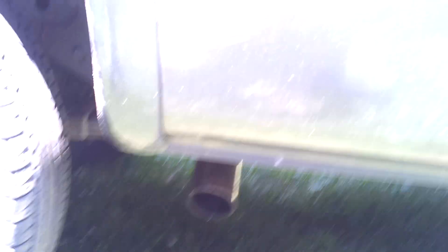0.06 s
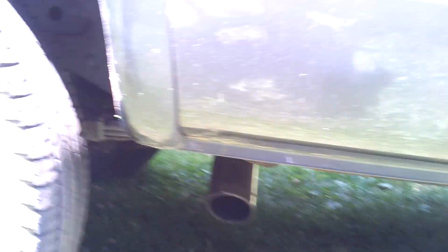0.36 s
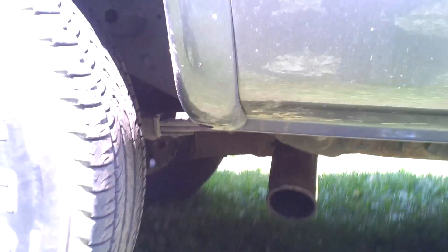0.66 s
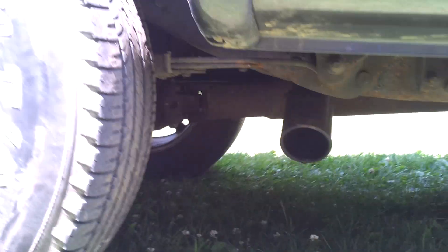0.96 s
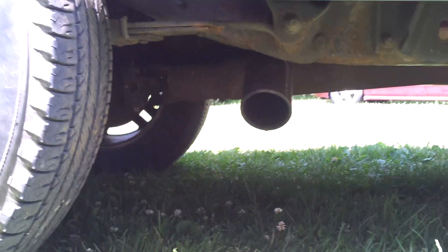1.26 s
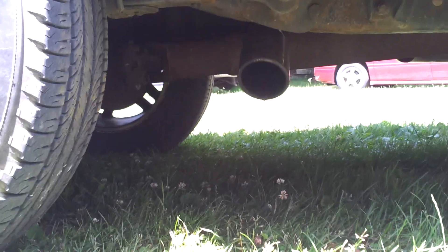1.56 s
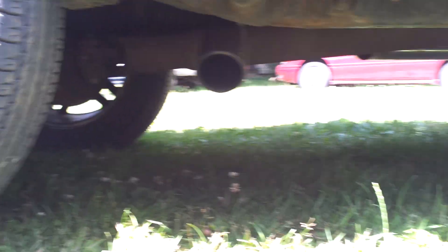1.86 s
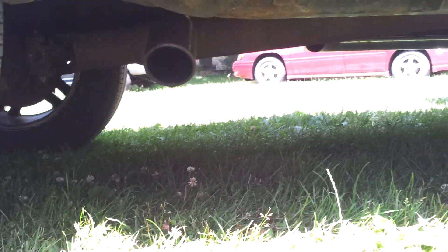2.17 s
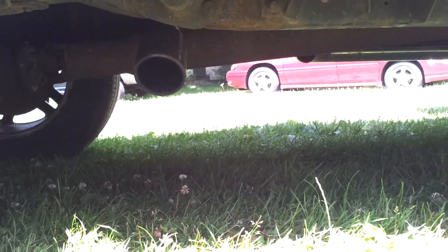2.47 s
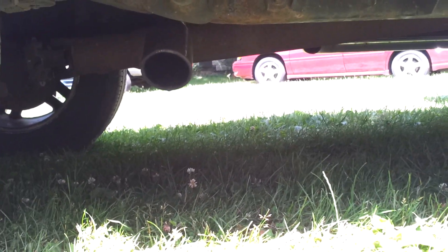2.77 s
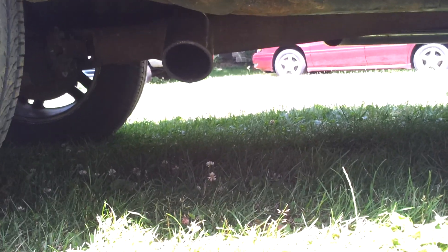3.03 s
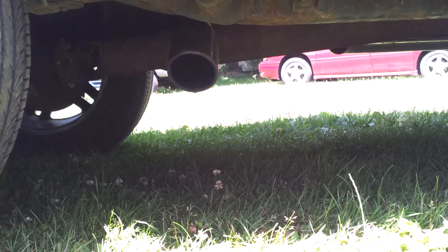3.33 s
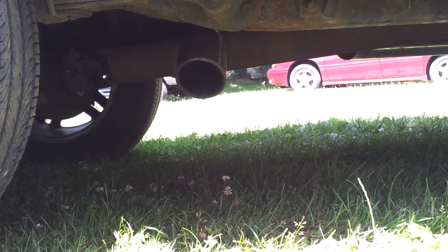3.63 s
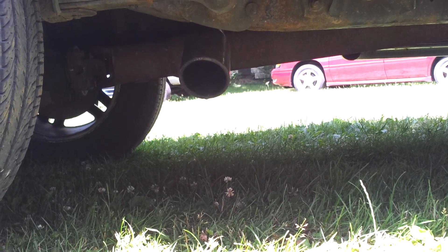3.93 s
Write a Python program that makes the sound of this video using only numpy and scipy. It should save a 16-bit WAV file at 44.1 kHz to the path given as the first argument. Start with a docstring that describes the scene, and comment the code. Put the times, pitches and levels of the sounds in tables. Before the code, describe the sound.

A truck idles outdoors throughout, its low exhaust rumble loping about five times a second, close by. Engine hum and hiss accompany the first second, with a faint, thin whistle falling at about 0.5 seconds. As the microphone sinks toward the tailpipe, light metallic rasps rise in pitch and small, high chirps repeat from 0.8 to 2 seconds. The throb then continues until 4 seconds, with only faint hiss behind.

```python
"""A parked V8 truck idles on grass, its uneven firings ringing the exhaust pipe in a lope that repeats
five times a second, each with a puff of gas. The microphone starts beside the body, in engine hum and
bright hiss; half a second in, a thin whistle falls and settles. As the microphone sinks, the ground
echo closes in and colours the exhaust, metallic rasps climb in pitch and a dry engine part chirps.
From about two seconds on it is just below the sill, near the tailpipe, the hiss faint behind."""
import sys
import numpy as np
from scipy import signal
from scipy.fft import rfft, irfft
from scipy.io import wavfile

SR = 44100
rng = np.random.default_rng(int(sys.argv[2]) if len(sys.argv) > 2 else 0)


def unload_audio(sound):
    """Save the sound as a 16-bit wav file, at the path given as the first command line argument."""
    columns = np.transpose(np.atleast_2d(sound))
    # keep every value between -1 and 1, then stretch to whole-number steps
    steps = np.round(np.clip(columns, -1, 1) * 32767)
    wavfile.write(sys.argv[1], SR, steps.astype(np.int16))


N = 176400
TIME = np.arange(N) / SR
RUN_TIME = np.arange(-SR, N) / SR  # starts a second early, so the pipe is already ringing

# idle speed of the engine: (time [s], speed [rpm])
ENGINE_SPEED = [(0, 601.3), (.5, 595.4), (.9, 604.5), (1.3, 608.6), (1.8, 614.8), (2.3, 619.6),
                (2.7, 607.2), (3.2, 604.8), (4, 598.2)]


def exhaust(pulse_ms=.35, puff_decay_s=.009, steady_flow=.4, gas_db=-22):
    """Each firing sends a pressure pulse down its bank's pipe, with a dying puff of turbulent gas."""
    # pipe resonances: (pitch [Hz], width [Hz], gain from first bank [dB], gain from second bank [dB])
    pipe_modes = [(54.55, 4.2, 10.5, -38), (64.7, 1, -11, -28), (80.6, 10.2, -7.5, 15),
                  (121.4, 8.2, -20, 10.5), (155.9, 3.84, 6, -20), (206, 4.3, -15, -1), (226, 16, -7.5, 3.5),
                  (306.3, 7.8, -4, 1), (354, 16, -6, -8.5), (410.2, 12, -11.5, -3), (452, 16, -10, -10),
                  (569, 10.6, -6, -19), (674, 8.7, -19, -1), (743, 15, -24, 1)]
    # resonances rung by the turbulent gas: (pitch [Hz], width [Hz], relative gain [dB])
    gas_modes = [(136.2, 24.8, 6.5), (252.5, 28.7, -1), (293.3, 17.5, -2), (363.6, 18.4, 1), (419, 9, -8.5),
                 (458, 20, 0), (536.5, 35.6, -2), (650, 34, -2), (754, 10, -2), (850, 130, -12.5),
                 (1120, 79, -18), (1456, 86, -20.5), (1736, 67, -20.5), (1945, 430, -27.5)]
    pulses = np.zeros((2, len(RUN_TIME)))
    flow = np.full(len(RUN_TIME), steady_flow)
    for start, pulse_db, puff_db, bank in firings():
        near = slice(*np.searchsorted(RUN_TIME, [start - .003, start + .06]))
        age = RUN_TIME[near] - start
        pulses[bank, near] -= from_db(pulse_db) * np.exp(-.5 * (age * 1000 / pulse_ms) ** 2) / pulse_ms
        flow[near] += from_db(puff_db) * (age > 0) * np.exp(-abs(age) / puff_decay_s)
    throb = sum(resonate(from_db(bank_db) @ pulses, hz, width) for hz, width, *bank_db in pipe_modes)
    turbulence = flow * rng.standard_normal(len(RUN_TIME))
    gas = unit_rms(ring(turbulence, gas_modes))
    return (throb + from_db(gas_db) * gas)[SR:]


def firings(jitter_s=.00013, uneven_db=.45):
    """Eight uneven firings to a cycle, as rows of (time [s], pulse [dB], puff [dB], bank)."""
    # cylinders in firing order: (lag to the tailpipe [s], pulse strength [dB])
    cylinders = [(.0027, -9.4), (.0018, -3.6), (.0022, -8), (.0011, -5), (.0005, -.5), (.0033, -9.2),
                 (.001, -.4), (.0026, -6.3)]
    # each cylinder's puff of gas: (relative strength [dB])
    puffs = [3, -8, -0.5, -2.5, -0.5, 4, -2.5, -5]
    # each cylinder's side of the engine: (bank [0 or 1])
    banks = [1, 0, 1, 0, 0, 1, 0, 1]
    fired = engine_cycles() * len(banks)
    number = np.arange(int(fired[0]) + 1, int(fired[-1]) + 1)
    cylinder = number % len(banks)
    lag, strength_db = np.array(cylinders)[cylinder].T
    chance = rng.standard_normal((len(number), 2))
    arrival = np.interp(number, fired, RUN_TIME) + lag + jitter_s * chance[:, 0]
    pulse_db = strength_db + uneven_db * chance[:, 1]
    return zip(arrival, pulse_db, np.array(puffs)[cylinder], np.array(banks)[cylinder])


def engine_cycles():
    """Engine cycles of two revolutions each, along RUN_TIME and counted from time zero."""
    cycles = np.cumsum(np.interp(RUN_TIME, *np.transpose(ENGINE_SPEED))) / 120 / SR
    return cycles - cycles[SR]


def over_ground(direct, echo_gain=.49):
    """Direct sound plus an echo off the ground that closes in as the microphone sinks."""
    # lag of the ground echo: (time [s], lag [ms])
    echo_lag = [(0, 1.97), (.25, 0.83), (.5, 0.93), (.9, 0.8), (1.4, 0.6), (2, 0.51), (4, .46)]
    # loudness of the exhaust along the microphone's path: (time [s], level [dB])
    nearness = [(0, 0.5), (.5, -1.5), (.8, 0.6), (1.1, 2), (1.5, 1.96), (2.2, 2.5), (2.7, 1.9), (3.2, 1),
                (4, 0)]
    echo = np.interp(TIME - curve(echo_lag) / 1000, TIME, direct)
    return from_db(curve(nearness)) * (direct + echo_gain * echo) / (1 + echo_gain)


def barks(rise_s=.007):
    """Pitched barks and pings, each a band of noise that swells once in every engine cycle."""
    # the barks and pings: (place in the cycle [0-1], pitch [Hz], width [Hz], relative level [dB])
    bands = [(.625, 620, 170, -27), (.99, 540, 170, -28), (.345, 670, 90, -29), (.62, 1170, 50, -39),
             (.99, 1495, 50, -39)]
    # they dip, then open up once the microphone sees the tailpipe: (time [s], gain [dB])
    openness = [(0, -0.5), (.6, -7), (1.3, -8.5), (2, -5.5), (3, -5.5), (4, -0.5)]
    barking = sum(from_db(db) * cycle_swell(place, rise_s) * narrow_noise(hz, width)
                  for place, hz, width, db in bands)
    return from_db(curve(openness)) * barking


def rasps(rise_s=.0071):
    """Three short metallic rasps in every engine cycle, all ringing in one band."""
    # the rasps: (place in the cycle [0-1], relative level [dB])
    strokes = [(0.93, -41.5), (.33, -35.5), (0.9, -34)]
    # their ring, which climbs as the microphone sinks: (time [s], pitch [Hz])
    pitch = [(0, 947), (.3, 1093), (.6, 1262), (.85, 1420), (1.3, 1400), (1.7, 1740), (2.3, 1808),
             (4, 1657)]
    # their loudness along the microphone's path: (time [s], gain [dB])
    path_gain = [(0, -1.5), (.4, -2), (.8, 1), (1.2, 1.5), (1.7, -9), (2.4, -9.5), (4, -8)]
    swells = sum(from_db(db) * cycle_swell(place, rise_s) for place, db in strokes)
    return from_db(curve(path_gain)) * swells * narrow_noise(curve(pitch), width_hz=340)


def engine_hum():
    """A clean hum locked to the crankshaft, loudest beside the body."""
    # tones of the hum: (order [periods per engine cycle], relative level [dB])
    tones = [(48, 0), (53, -9), (60, -6)]
    # hum at the microphone: (time [s], level [dB])
    level = [(0, -24.5), (.25, -24.5), (.8, -25.5), (1.2, -30), (2, -38.5), (4, -32)]
    phase = 2 * np.pi * engine_cycles()[SR:]
    hum = sum(from_db(db) * np.sin(order * phase) for order, db in tones)
    return from_db(curve(level)) * unit_rms(hum)


def engine_hiss(steady_db=-41.5, sizzle_db=-43):
    """Broad hiss with sizzling bands, brighter while the microphone is beside the body."""
    # steady hiss under the body: (frequency [Hz], relative density [dB])
    steady_spectrum = [(900, 20.5), (1800, 10.5), (2600, -4), (3300, 6.5), (4500, -4.5), (6000, 5.5),
                       (7600, -5), (9000, -0.5), (11500, -29)]
    # narrow sizzling bands in it: (pitch [Hz], width [Hz], relative gain [dB])
    sizzle_bands = [(2946, 40, 3.5), (3890, 215, 3.5), (5160, 180, -0.5), (6320, 410, 1), (6860, 380, 5)]
    # brighter hiss beside the body: (frequency [Hz], relative density [dB])
    bright_spectrum = [(700, 12), (1500, 4), (2800, -1), (4000, 0.5), (5200, -0.5), (7000, 3), (8500, -1.5),
                       (10000, -5), (12000, -10)]
    # that brighter hiss at the microphone: (time [s], level [dB])
    bright_level = [(0, -31.5), (.09, -31), (.18, -33.5), (.33, -33.5), (.45, -38.5), (.62, -37.5),
                    (.72, -33), (.9, -33.5), (.98, -38), (1.14, -42), (1.28, -35), (1.45, -41),
                    (1.7, -42.5), (2.55, -44.5), (2.69, -41), (2.85, -45.5), (4, -44.5)]
    sizzle = from_db(sizzle_db) * unit_rms(ring(rng.standard_normal(N), sizzle_bands))
    steady = from_db(steady_db) * shaped_noise(steady_spectrum)
    bright = from_db(curve(bright_level)) * shaped_noise(bright_spectrum)
    return steady + sizzle + bright


def whistle():
    """A thin, hissing whistle that falls, settles and fades to a trace."""
    # course of the whistle: (time [s], pitch [Hz], level [dB])
    course = [(0.531, 6700, -65), (.565, 6400, -36.5), (.6, 5600, -42), (.64, 5250, -47),
              (0.728, 5130, -43), (1.1, 5100, -47), (1.3, 5120, -57)]
    times, hz, db = np.transpose(course)
    level = from_db(np.interp(TIME, times, db))
    return level * narrow_noise(np.interp(TIME, times, hz), width_hz=480)


def chirps():
    """A dry engine part chirps now and then, at about the same point of the cycle."""
    # the chirps: (time [s], level [dB])
    events = [(0.799, -37), (0.997, -34.5), (1.195, -31), (1.39, -28), (1.588, -37), (1.784, -37),
              (1.979, -28), (2.567, -40), (2.957, -38), (3.156, -43), (3.755, -52)]
    return sum(burst(start, db, hz=6880, width_hz=200, rise_s=.004) for start, db in events)


def ticks():
    """Stray small knocks and ticks, each a very short burst of noise."""
    # the knocks and ticks: (time [s], pitch [Hz], width [Hz], level [dB])
    events = [(.075, 2300, 700, -33), (.12, 2300, 695, -40), (0.521, 8000, 6000, -34),
              (0.593, 8100, 6000, -33), (1.733, 980, 450, -24.5), (2.737, 3080, 200, -39),
              (3.731, 3080, 193, -41.5)]
    return sum(burst(start, db, hz, width, rise_s=.0025) for start, hz, width, db in events)


def cycle_swell(place, rise_s):
    """A quick rise and exponential fall at one place of every engine cycle."""
    cycle_s = 120 / curve(ENGINE_SPEED)
    age = (engine_cycles()[SR:] - place) % 1 * cycle_s / rise_s
    return age * np.exp(1 - age)


def burst(start, db, hz, width_hz, rise_s):
    """A resonance rubbed briefly: quick swell, exponential fall."""
    age = np.maximum(TIME - start, 0) / rise_s
    return from_db(db) * age * np.exp(1 - age) * narrow_noise(hz, width_hz)


def narrow_noise(hz, width_hz):
    """Unit-rms noise in a band around a steady or moving centre."""
    lowpass = signal.butter(2, width_hz / 2, fs=SR, output="sos")
    wobble = signal.sosfilt(lowpass, rng.standard_normal((2, N)))
    phase = 2 * np.pi * np.cumsum(np.broadcast_to(hz, N)) / SR
    return unit_rms(wobble[0] * np.cos(phase) + wobble[1] * np.sin(phase))


def shaped_noise(spectrum):
    """Unit-rms noise with the given spectrum, falling away below its first point."""
    hz, db = np.transpose(spectrum)
    bin_hz = np.arange(N // 2 + 1) * SR / N + 1
    gain = from_db(np.interp(np.log(bin_hz), np.log(hz), db)) / (1 + (hz[0] / bin_hz) ** 2)
    return unit_rms(irfft(rfft(rng.standard_normal(N)) * gain, N))


def ring(x, modes):
    """Parallel resonances of alternating sign."""
    return sum((-1) ** k * from_db(db) * resonate(x, hz, width)
               for k, (hz, width, db) in enumerate(modes))


def resonate(x, hz, width_hz):
    """Two-pole resonance with gain 1 at its peak."""
    radius = np.exp(-np.pi * width_hz / SR)
    feedback = [1, -2 * radius * np.cos(2 * np.pi * hz / SR), radius ** 2]
    return signal.lfilter(np.array([1, 0, -1]) * (1 - radius ** 2) / 2, feedback, x + 1e-18)


def curve(rows):
    """Join (time [s], value) rows by straight lines."""
    return np.interp(TIME, *np.transpose(rows))


def from_db(db):
    """Decibels to gain."""
    return 10 ** (np.asarray(db) / 20)


def unit_rms(x):
    """Scale to unit rms."""
    return x / np.sqrt(np.mean(x ** 2) + 1e-20)


def scene():
    """One close microphone: exhaust in front, engine noises behind."""
    front = over_ground(exhaust()) + rasps() + barks()
    behind = engine_hum() + whistle() + engine_hiss() + chirps() + ticks()
    return (front + behind)[None]


def record(dry, low_cut_hz=48.2, high_cut_hz=11600):
    """The microphone loses the deepest bass, full scale clips the peaks and the top is cut."""
    low_cut = signal.butter(2, low_cut_hz, "high", fs=SR, output="sos")
    high_cut = signal.ellip(10, .1, 90, high_cut_hz, fs=SR, output="sos")
    clipped = np.clip(signal.sosfilt(low_cut, dry), -1, 1)
    return signal.sosfilt(high_cut, clipped)


dry = scene()
out = record(dry)
unload_audio(out)
```